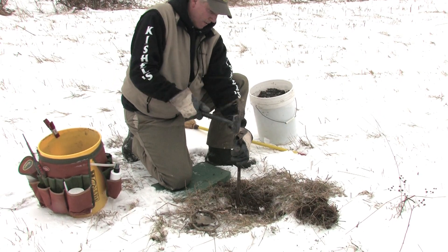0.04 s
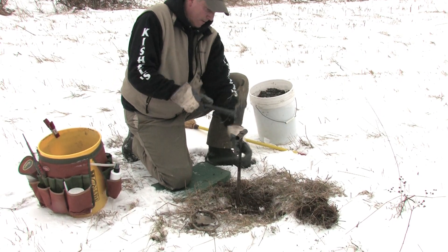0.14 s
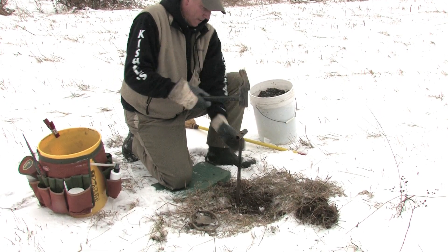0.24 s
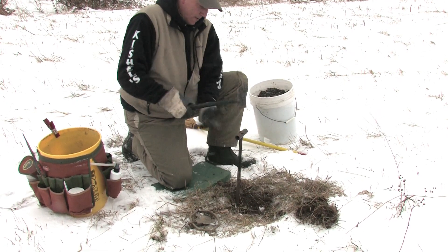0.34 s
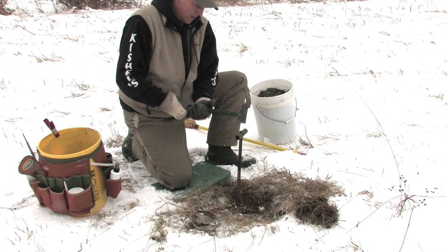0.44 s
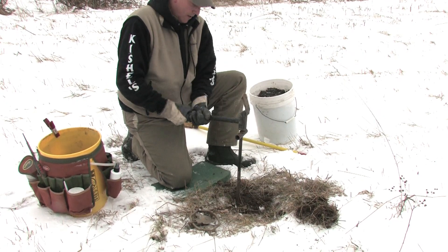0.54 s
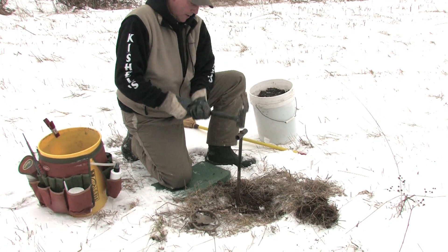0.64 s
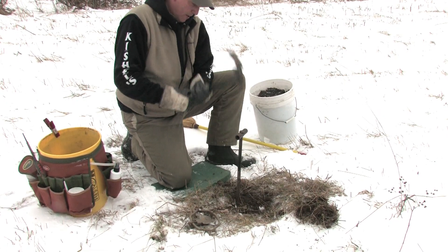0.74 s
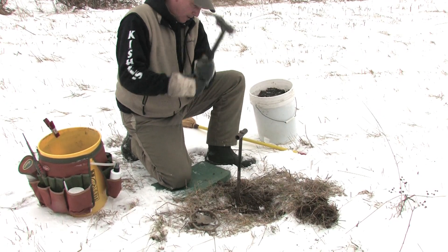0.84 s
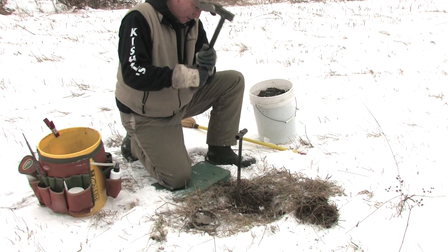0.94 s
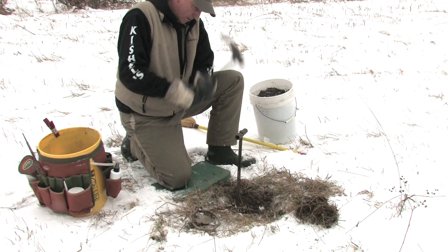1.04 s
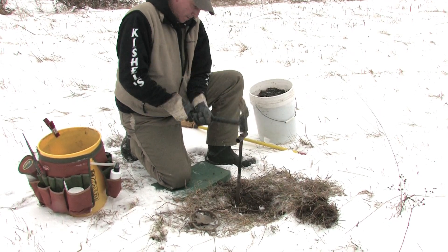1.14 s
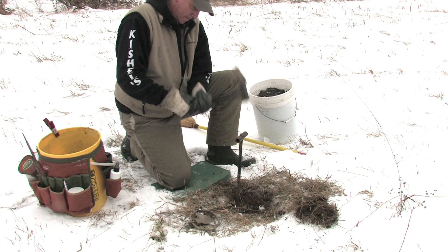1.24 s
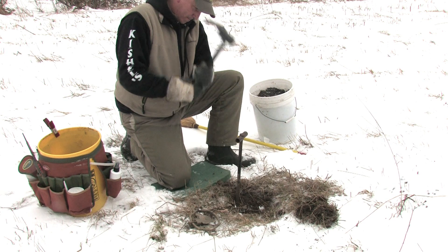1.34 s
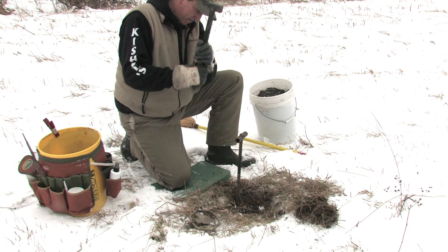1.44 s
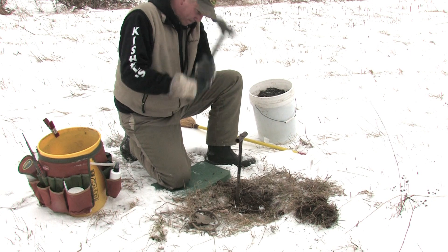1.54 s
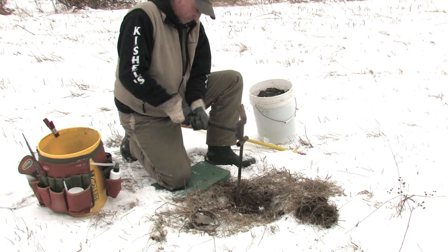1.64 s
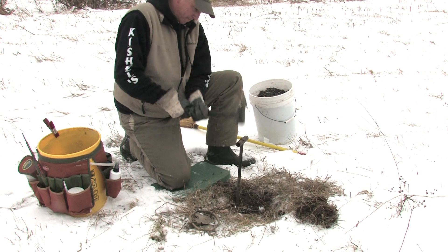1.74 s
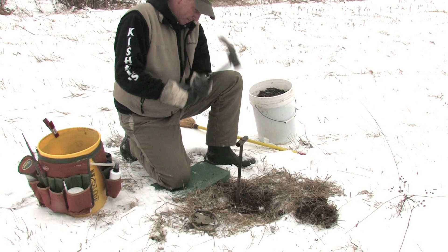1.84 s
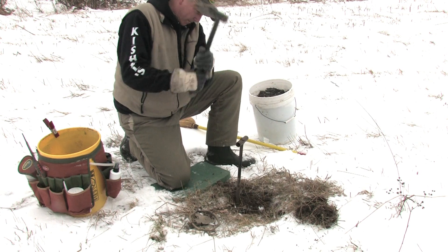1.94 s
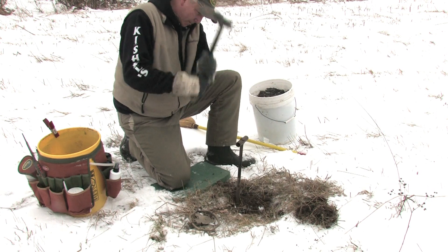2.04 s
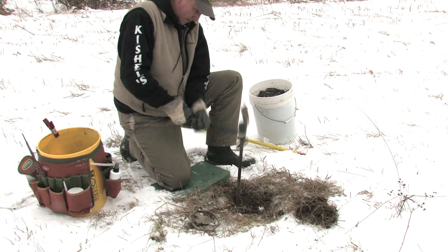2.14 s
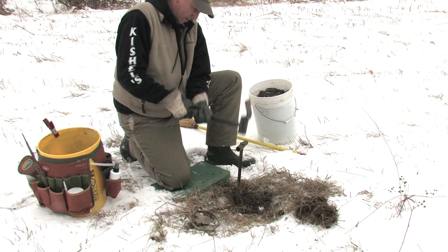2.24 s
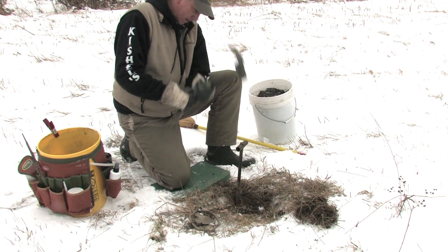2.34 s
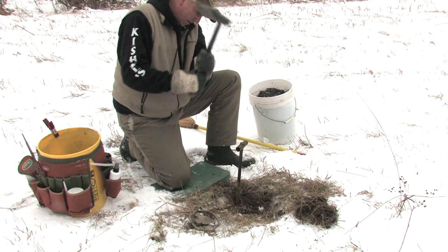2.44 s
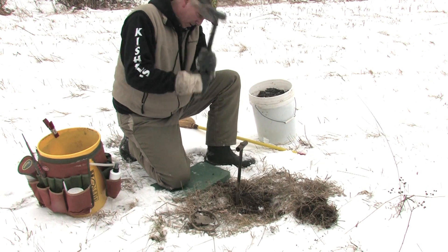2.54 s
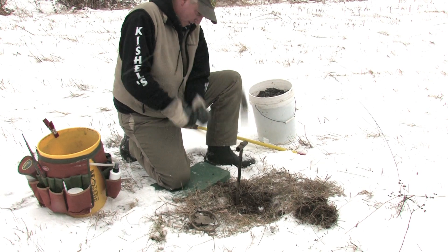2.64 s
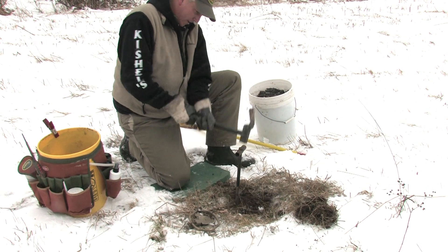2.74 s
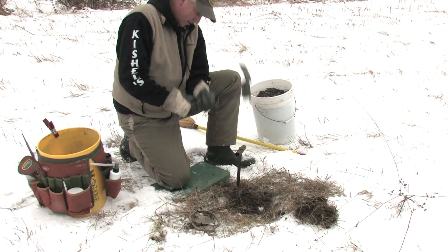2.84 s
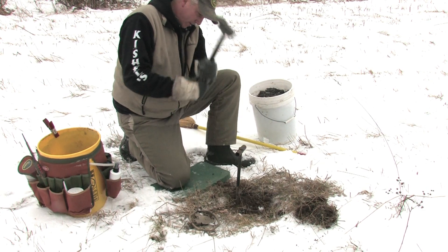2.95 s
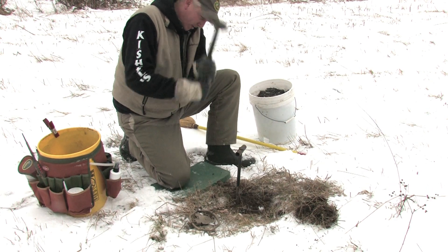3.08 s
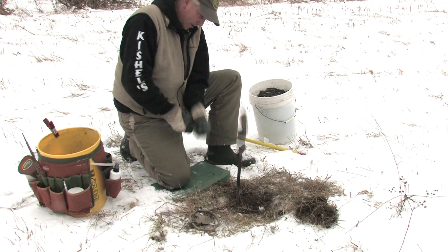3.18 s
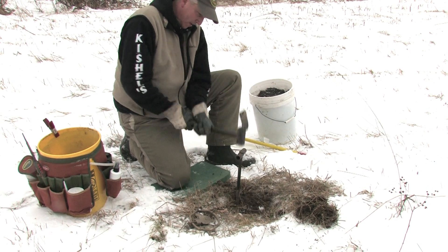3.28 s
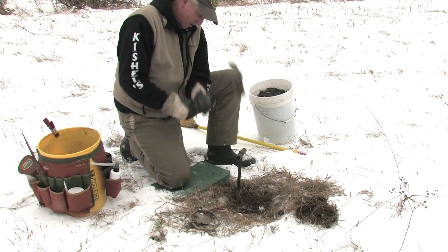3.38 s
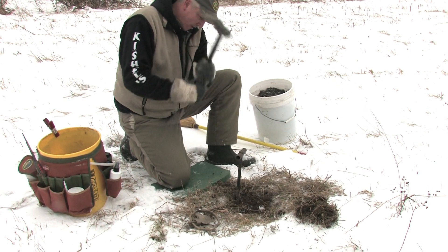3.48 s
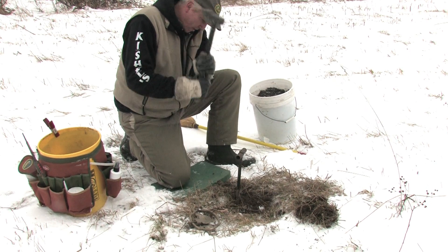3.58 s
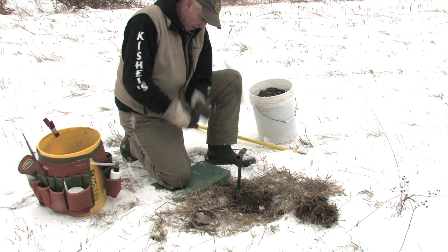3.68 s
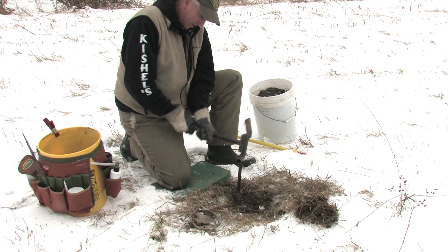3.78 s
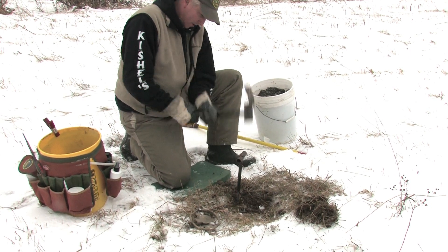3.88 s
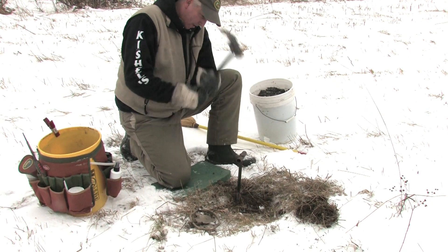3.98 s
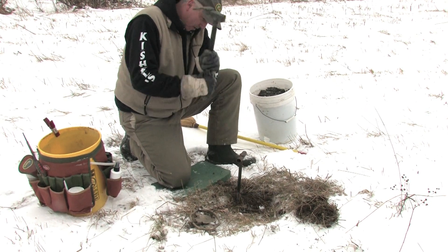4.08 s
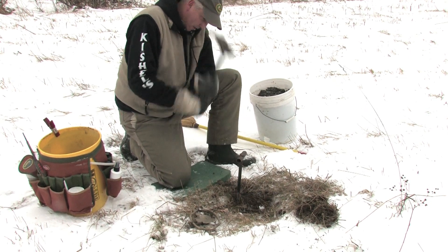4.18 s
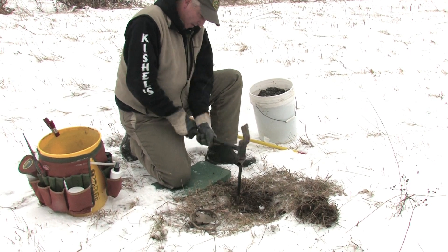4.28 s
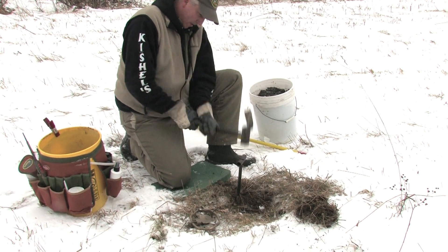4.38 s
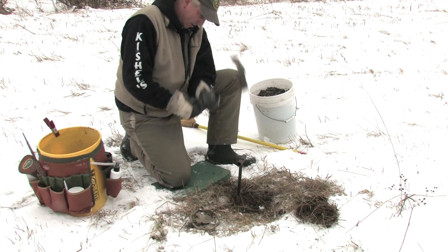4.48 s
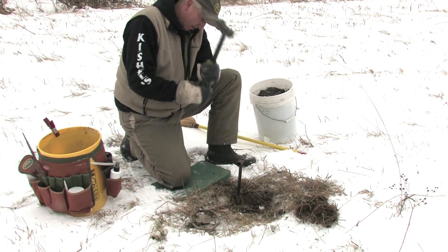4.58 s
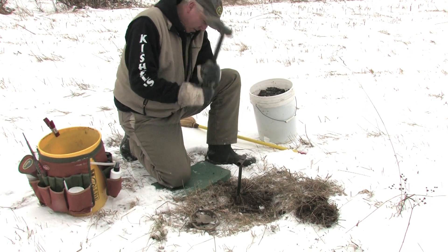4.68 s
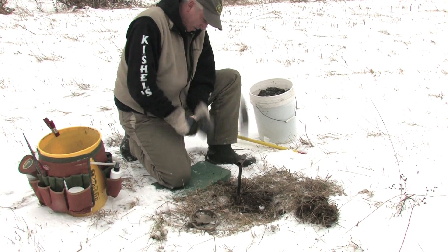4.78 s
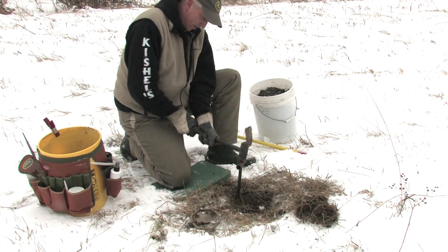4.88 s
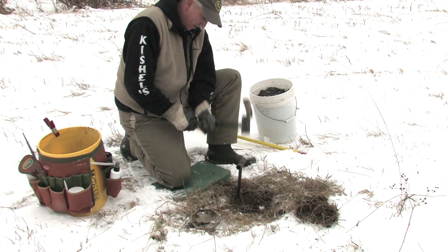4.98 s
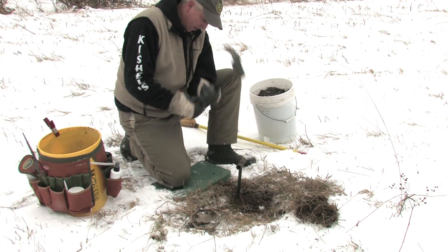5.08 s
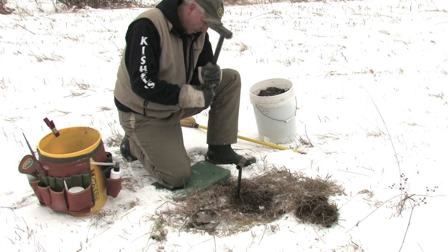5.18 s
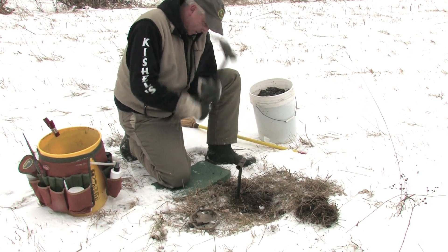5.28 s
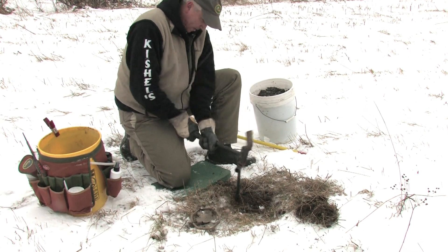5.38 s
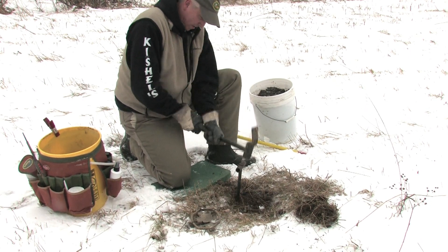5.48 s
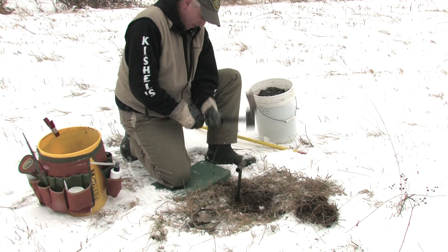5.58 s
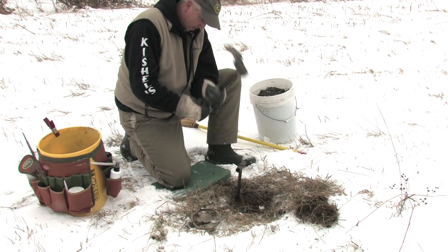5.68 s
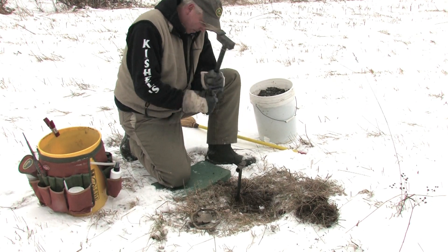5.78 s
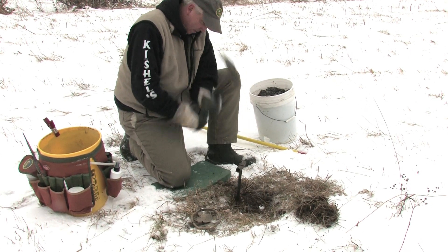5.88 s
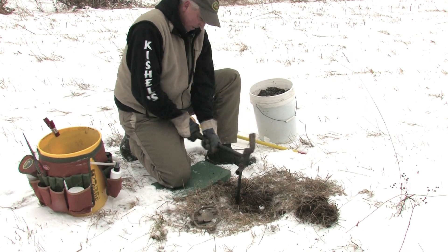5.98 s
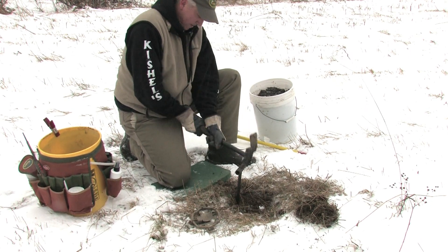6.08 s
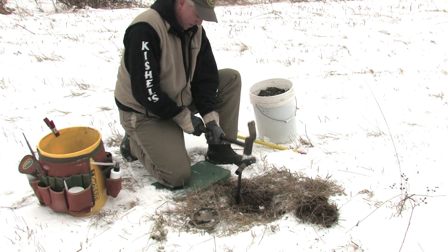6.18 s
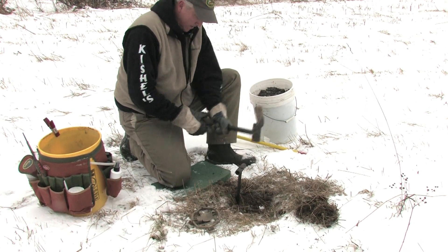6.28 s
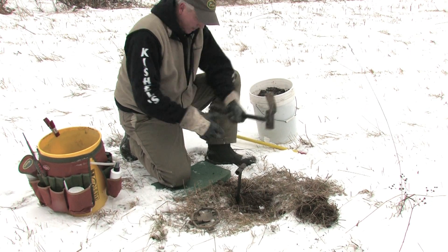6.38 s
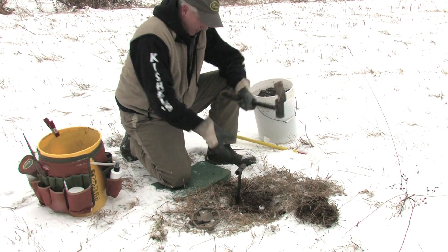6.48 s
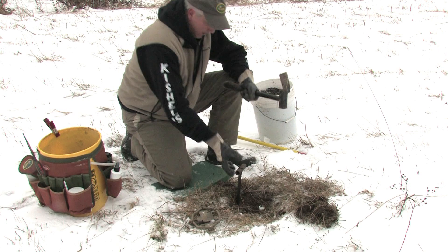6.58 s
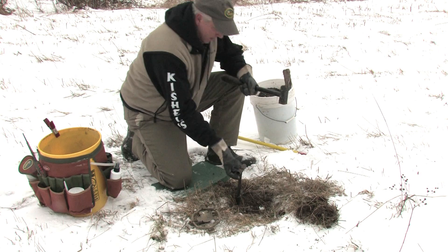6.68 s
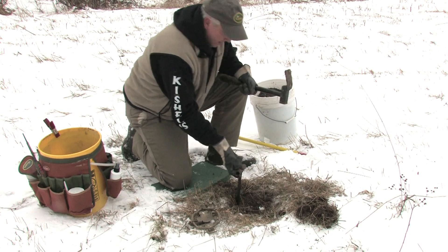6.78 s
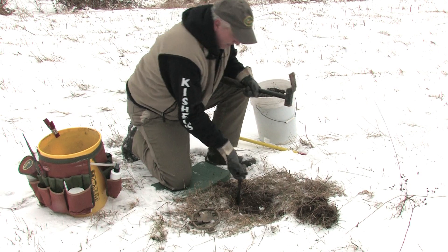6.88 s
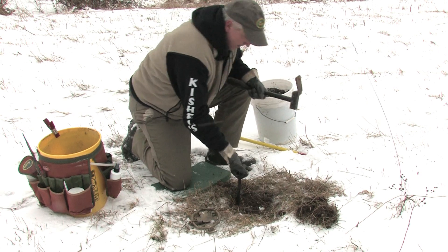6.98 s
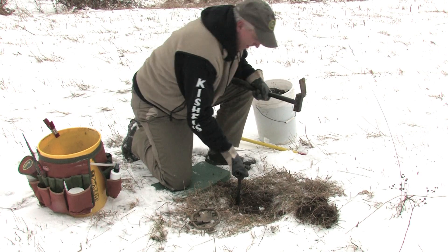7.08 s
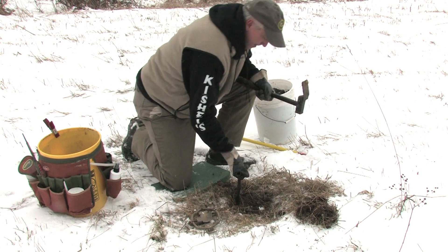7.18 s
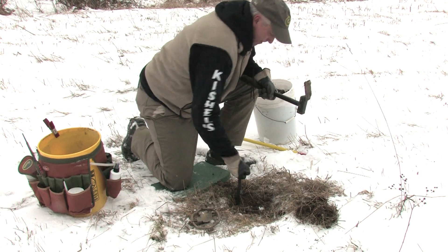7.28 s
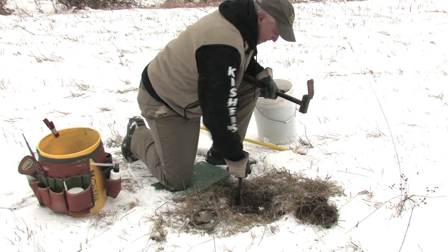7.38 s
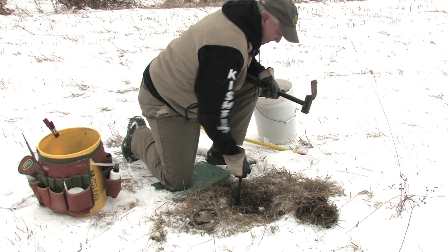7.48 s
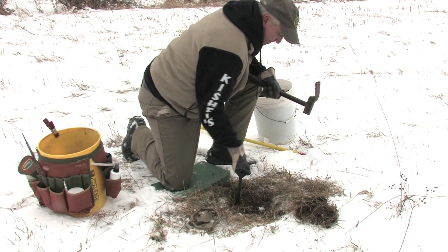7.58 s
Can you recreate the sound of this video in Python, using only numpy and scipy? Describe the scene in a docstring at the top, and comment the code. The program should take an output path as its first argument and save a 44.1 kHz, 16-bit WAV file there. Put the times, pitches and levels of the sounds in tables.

```python
"""Steel stake in frozen ground

Ten hammer blows drive a stake in an open, snowy field. Each overloads the microphone, whose gain drops
and creeps back. Soil chokes the ring of the stake, which brightens as it sinks; distant trees return
a faint echo. Wind buffets the microphone, sleeves swish with each swing, and at the end a glove works
the stake in dry grass."""
import sys
import numpy as np
from scipy import signal
from scipy.fft import rfft, irfft
from scipy.io import wavfile

SR = 44100
rng = np.random.default_rng(int(sys.argv[2]) if len(sys.argv) > 2 else 0)


def waveform_to_disk(signal):
    """Save audio, clipped to [-1, 1], as 16-bit WAV at the path in sys.argv[1]."""
    frames = np.transpose(np.atleast_2d(signal))
    scaled = np.clip(frames, -1, 1) * 32767
    samples = np.round(scaled).astype(np.int16)
    wavfile.write(sys.argv[1], SR, samples)


N = 336483
TIME_S = np.arange(N) / SR
BLOW_TIME_S = TIME_S[:SR // 3]

# hammer blows: start_s, force_db, rebound_delay_s, low_mode_db, high_modes_db, soil_knock_db
BLOWS = [(1.1552, -5.5, .0079, 12, -8, 0.5), (1.6816, -6, .01, 9, 1.5, -8.5),
         (2.1957, -1.5, .0095, 1, -1, -4), (2.7155, -3, .0089, 1, -6.5, 1.5),
         (3.2356, -3.5, .0094, 5.5, 5.5, 2), (3.769, -4.5, .01, -5.5, 5.5, 1.5),
         (4.3075, -4.5, .008, -0.5, 1, 5.5), (4.851, -4.5, .0096, -5, 8, -9.5),
         (5.4171, -4.5, .0079, -9, 5.5, -2.5), (5.9987, -6, .008, -7.5, 12, -4)]
# bending modes of the stake: pitch_hz, level_db, t60_s
STAKE_MODES = [(847.3, -30, 0.049), (1412, -7.5, 0.044), (1517, -14, 0.024), (2420, -3.5, 0.019),
               (2569.5, 3, 0.042), (2590, -5, 0.0093), (3280, -15.5, .03), (3942, -3, 0.035),
               (4109, -4, 0.03), (4215, 0.5, 0.015), (4470, -13, 0.017), (4706, -8, .025),
               (5820, -21, 0.016), (6300, -7, 0.016), (7580, -8.5, 0.017), (8089, -1, 0.026),
               (8177, -6.5, .028), (8200, -63, 0.56), (8360, -11.5, 0.031), (10010, -6.5, .028),
               (10080, -19.5, 0.13), (11410, -16.5, .036), (10620, -14.5, 0.063), (13300, -15, .03)]
# lingering modes of the hammer head: pitch_hz, level_db, t60_s
HEAD_MODES = [(10330, -60, 0.22), (10530, -52.5, .16), (10690, -52, .14), (10860, -52, .16)]
# dense vibration of steel and soil: freq_hz, density_db
CRASH_SPECTRUM = [(50, -9), (150, -7), (300, -16), (620, -0.5), (920, -3), (1150, -15.5), (1700, 2.5),
                  (2300, 5.5), (3300, -4.5), (5200, -4.5), (7200, 6), (9200, -2), (10600, -1),
                  (11800, -13.5), (15000, -14)]
# its damping: freq_hz, t60_s
CRASH_DECAY = [(100, 0.0067), (700, 0.033), (2000, 0.023), (6000, .022), (10500, 0.023), (15000, 0.0067)]
# faint dying ring of steel at the start: start_s, level_db
OPENING_RING = [(.001, -38)]
# its modes: pitch_hz, level_db, t60_s
OPENING_RING_MODES = [(968, 0, 0.076), (2060, 8, 0.032), (2500, -4.5, 0.093), (3940, 13, 0.04),
                      (4550, 0.5, 0.042), (6300, -9.5, 0.068), (8100, 1.5, 0.045), (10520, 3.5, 0.094)]
# echo from the trees: freq_hz, density_db
ECHO_SPECTRUM = [(1000, -9.5), (2600, -9.5), (3300, -16), (4050, -0.5), (5200, -19), (7300, -8),
                 (7850, -3.5), (8100, 4), (8500, -5), (9300, -13), (10600, -2), (11500, -17), (15000, -21)]
# wind strength: time_s, level_db
GUSTS = [(0.0, -50), (0.5, -31.9), (0.68, -23.5), (0.89, -25.5), (1.03, -18), (1.23, -29), (1.55, -29),
         (1.87, -41.5), (2.17, -24.5), (2.54, -42.5), (2.62, -31), (2.86, -36.5), (3.74, -40),
         (4.15, -33.5), (4.27, -44), (4.73, -53.5), (5.27, -51), (5.34, -46.7), (5.68, -60), (6.74, -50),
         (6.82, -41.5), (7.11, -47), (7.33, -35.5), (7.41, -48.5), (7.63, -41)]
# eddies at the microphone: freq_hz, density_db
WIND_SPECTRUM = [(15, -31), (30, -13.5), (55, -0.5), (120, -1), (200, -5.5), (300, -10.5), (450, -16.5),
                 (650, -23), (1000, -33.5), (1500, -42), (2500, -50), (5000, -80.5)]
# left-right likeness of the eddies: freq_hz, correlation
WIND_CORRELATION = [(40, 0.23), (100, .55), (200, 0.46), (600, 0.067), (1500, 0.47)]
# sleeve friction: freq_hz, density_db
SLEEVE_SPECTRUM = [(300, -11), (550, 0.5), (750, 3), (1100, -1.5), (1800, 0.5), (2100, -3), (2400, -1.5),
                   (3100, -11), (3600, -7.5), (4050, -4), (4600, -12.5), (5400, -24.5), (8000, -34.5),
                   (15000, -54)]
# glove friction: freq_hz, density_db
GLOVE_SPECTRUM = [(500, -25.5), (2000, -9.5), (3300, -6), (4000, 8), (5000, -9.5), (6400, 5.5), (7300, 0.5),
                  (8200, 3), (9500, -1), (11500, -9), (13500, -9.5), (14500, -18), (16000, -36)]
# gripping, winding up, laying the hammer aside, working the stake: start_s, length_s, sleeve_db, glove_db
ARM_MOVES = [(.32, 0.022, -55.5, -59), (.58, 0.053, -50, -62), (.68, 0.59, -57.5, -66.5),
             (2.34, 0.159, -63.5, -74), (6.3, 0.087, -65, -64), (6.67, 0.92, -62, -70.5),
             (6.82, 0.24, -59.5, -67.5), (6.93, 0.02, -52, -59)]
# glove sliding on steel: start_s, length_s, level_db, pitch_hz
GLOVE_RUBS = [(2.35, .17, -61.5, 1752), (6.28, 0.084, -69, 2466)]
# snaps of dry stalks, clothing and tools: start_s, level_db, t60_s, centre_hz
SNAPS = [(.001, -31, 0.037, 3270), (0.4365, -34.5, 0.05, 1570), (0.444, -37, 0.006, 2140),
         (0.586, -44.5, 0.02, 1820), (1.444, -58, 0.0093, 3960), (1.98, -56, 0.016, 2500),
         (6.057, -44, .02, 4000), (6.087, -52, 0.059, 2980), (6.104, -48, .02, 4963),
         (6.662, -51, 0.026, 1060), (6.811, -50.5, 0.029, 8000), (6.884, -35, 0.02, 980),
         (7.4056, -32, 0.01, 2760)]


def hammering(rebound_db=-11):
    """Each blow: main contact, ring of the head, weaker contact as the stake springs back."""
    out = np.zeros(N)
    for k, (start_s, force_db, rebound_delay_s, low_db, high_db, knock_db) in enumerate(BLOWS):
        middle_db = 3.5 - 0.52 * k   # middle modes fade as the stake sinks
        head_db = 1.5 + 22 * np.exp(-k / 1.9)   # louder while the stake stands loose
        main = contact(low_db, middle_db, high_db, knock_db, crash_db=3, scatter_db=0.36)
        rebound = contact(low_db - 3.5, middle_db - 5.5, high_db - 1.5, knock_db,
                          crash_db=2.5, scatter_db=1.5)
        add(out, start_s, from_db(force_db) * (main + head_ring(head_db)))
        add(out, start_s + rebound_delay_s, from_db(force_db + rebound_db) * rebound)
    return out


def contact(low_db, middle_db, high_db, knock_db, crash_db, scatter_db):
    """Steel on steel; the grip of the soil shifts and roughens the stake's modes each time."""
    pitch_hz, level_db, t60_s = np.transpose(STAKE_MODES)
    detune, scatter = rng.standard_normal((2, len(pitch_hz)))
    colour_db = at_hz([(900, -low_db / 2), (1350, low_db), (2500, middle_db),
                       (4200, (middle_db + high_db) / 2), (8000, high_db), (10700, 0)], pitch_hz)
    mode_db = level_db + colour_db + scatter_db * scatter
    modes = ring(pitch_hz * (1 + 0.003 * detune), mode_db, t60_s, linewidth_hz=8.3)
    return modes + from_db(crash_db) * crash(high_db, knock_db)


def crash(bright_db, knock_db):
    """Dense vibration of steel and soil; each octave builds in about a cycle and dies at its own rate."""
    size = len(BLOW_TIME_S)
    spectrum = rfft(noise(CRASH_SPECTRUM, size))
    octave = np.clip(np.log2(np.maximum(bins_hz(size), 1) / 100), 0, 7)
    out = np.zeros(size)
    for k in range(8):
        centre_hz = 100 * 2 ** k
        tilt_db = bright_db * (k - 5) / 8   # a firmly seated stake is brighter
        soil_db = at_hz([(150, 0), (400, knock_db), (1600, 0)], centre_hz)
        band = irfft(spectrum * np.maximum(0, 1 - abs(octave - k)), size)
        attack = 1 - np.exp(-BLOW_TIME_S * centre_hz)
        out += from_db(tilt_db + soil_db) * band * attack * decay(at_hz(CRASH_DECAY, centre_hz))
    return out


def head_ring(ring_db, scatter_db=3.5):
    """Close modes of the hammer head beat, mixed anew by each blow and widened by the handle's grip."""
    pitch_hz, level_db, t60_s = np.transpose(HEAD_MODES)
    mode_db = level_db + ring_db + scatter_db * rng.standard_normal(len(pitch_hz))
    return ring(pitch_hz, mode_db, t60_s, linewidth_hz=20)


def opening_ring():
    """Faint dying ring of steel from a blow struck just before the start."""
    out = np.zeros(N)
    for start_s, level_db in OPENING_RING:
        add(out, start_s, from_db(level_db) * ring(*np.transpose(OPENING_RING_MODES)))
    return out


def wind(trim_db=-0.5, lumps_db=3, left_db=1.34, small_above_hz=304, brighten_db_per_db=0.068):
    """Lumpy eddies at the two microphone ports, partly shared; strong gusts are brighter."""
    correlation = np.clip(at_hz(WIND_CORRELATION, bins_hz(N)), 0, 1)
    mid = irfft(rfft(noise(WIND_SPECTRUM, N)) * np.sqrt(1 + correlation), N)
    side = irfft(rfft(noise(WIND_SPECTRUM, N)) * np.sqrt(1 - correlation), N)
    ports = np.array([(mid + side) * from_db(left_db), mid - side])
    eddies = unit_rms(ports * from_db(lumps_db * drift(rate_hz=60)))
    small = signal.sosfiltfilt(highpass(small_above_hz), eddies)
    large = eddies - small
    gust_db = np.interp(TIME_S, *np.transpose(GUSTS))
    bright_db = brighten_db_per_db * (gust_db - gust_db.mean())
    return from_db(gust_db + trim_db) * (large + small * from_db(bright_db))


def arm_motion(lift_after_s=0.31, lift_s=0.047, downswing_s=0.025):
    """Rubbing strength of sleeves and gloves: lifts, downswings and other moves add in power."""
    lift_db, downswing_db, rest_db = (-66, -73.5), (-62, -74), (-69, -78)   # sleeve, glove
    blows_s = [blow[0] for blow in BLOWS]
    lifts = [(blow_s + lift_after_s, lift_s, *lift_db) for blow_s in blows_s[:-1]]
    downswings = [(blow_s - downswing_s, downswing_s, *downswing_db) for blow_s in blows_s]
    power = from_db(rest_db)[:, None] ** 2
    for start_s, length_s, *levels_db in lifts + downswings + list(ARM_MOVES):
        power = power + (from_db(levels_db)[:, None] * stroke(start_s, length_s)) ** 2
    return np.sqrt(power)


def rustle(motion, spectrum, flutter_db, grain_db=1.5):
    """Fabric rubs in tiny catches as the arms move."""
    friction = noise(spectrum, N)
    catches_db = grain_db * drift(rate_hz=900) + flutter_db * drift(rate_hz=70)
    return motion * unit_rms(friction * from_db(catches_db))


def glove_rubs(width_hz=90):
    """A glove slides on steel: friction through one narrow resonance."""
    out = np.zeros(N)
    radius = np.exp(-np.pi * width_hz / SR)
    for start_s, length_s, level_db, pitch_hz in GLOVE_RUBS:
        resonance = [1, -2 * radius * np.cos(2 * np.pi * pitch_hz / SR), radius ** 2]
        tone = signal.lfilter([1, 0, -1], resonance, rng.standard_normal(N))
        out += from_db(level_db) * stroke(start_s, length_s) * unit_rms(tone)
    return out


def snaps(ticks_per_s=4, tick_db=-59, spread_db=1.5, tick_t60_s=0.015, tick_hz=6000):
    """Stalks, clothing and tools snap in short noise bursts; fainter ticks come at random."""
    out = np.zeros(N)
    ticks = [(start_s, tick_db + spread_db * rng.standard_normal(), tick_t60_s, tick_hz)
             for start_s in TIME_S[rng.random(N) < ticks_per_s / SR]]
    for start_s, level_db, t60_s, centre_hz in list(SNAPS) + ticks:
        edges_hz = [centre_hz / 2.6, min(centre_hz * 2.6, 0.32 * SR)]
        bandpass = signal.butter(2, edges_hz, "band", fs=SR, output="sos")
        burst = unit_rms(signal.sosfilt(bandpass, rng.standard_normal(len(BLOW_TIME_S))))
        add(out, start_s, from_db(level_db) * decay(t60_s) * burst)
    return out


def tree_echo(delay_s=0.056, near_db=-50, near_t60_s=0.14, far_db=-62.5, far_t60_s=0.87):
    """Trunks some ten metres off scatter each blow back as a treble swell; farther ones add a tail."""
    out = np.zeros(N)
    swell = np.minimum(BLOW_TIME_S / delay_s, 1) ** 10
    near = from_db(near_db - 60 * np.maximum(BLOW_TIME_S - delay_s, 0) / near_t60_s)
    far = from_db(far_db) * decay(far_t60_s)
    envelope = swell * (near + far)
    for start_s, force_db, *_ in BLOWS:
        add(out, start_s, from_db(force_db) * envelope * noise(ECHO_SPECTRUM, len(envelope)))
    return out


def ring(pitch_hz, level_db, t60_s, linewidth_hz=0):
    """Struck modes as decaying sines; rubbing makes the phase wander, widening each line."""
    signs = rng.choice([-1, 1], len(pitch_hz))
    steps = rng.standard_normal((len(pitch_hz), len(BLOW_TIME_S)))
    wander_rad = np.cumsum(steps, axis=1) * np.sqrt(2 * np.pi * linewidth_hz / SR)
    fade = from_db(level_db[:, None] - 60 * BLOW_TIME_S / t60_s[:, None])
    return signs @ (fade * np.sin(2 * np.pi * pitch_hz[:, None] * BLOW_TIME_S + wander_rad))


def stroke(start_s, length_s, attack_s=0.025, release_s=0.035):
    """Envelope of one movement: swell, hold, fade."""
    before_s = np.maximum(start_s - TIME_S, 0)
    after_s = np.maximum(TIME_S - start_s - length_s, 0)
    return np.exp(-before_s / attack_s - after_s / release_s)


def decay(t60_s):
    """Exponential decay over the length of a blow."""
    return from_db(-60 * BLOW_TIME_S / t60_s)


def noise(spectrum, size):
    """Coloured noise, unit power."""
    white = rfft(rng.standard_normal(size))
    return unit_rms(irfft(white * from_db(at_hz(spectrum, bins_hz(size))), size))


def drift(rate_hz):
    """Random wander, unit power."""
    points = rng.standard_normal(N // 20)
    return unit_rms(np.interp(TIME_S * rate_hz, np.arange(len(points)), points))


def at_hz(table, freq_hz):
    """Read a table on a log-frequency axis."""
    knots_hz, values = np.transpose(table)
    return np.interp(np.log(np.maximum(freq_hz, 1)), np.log(knots_hz), values)


def bins_hz(size):
    """Frequencies of a real FFT."""
    return np.arange(size // 2 + 1) * SR / size


def highpass(corner_hz):
    """Second-order high-pass sections."""
    return signal.butter(2, corner_hz, "high", fs=SR, output="sos")


def from_db(level_db):
    """Decibels to gain."""
    return 10 ** (np.asarray(level_db) / 20)


def unit_rms(x):
    """Scale to unit power."""
    return x / np.sqrt(np.mean(x ** 2) + 1e-20)


def add(track, start_s, sound):
    """Mix a sound into a track."""
    start = max(0, round(start_s * SR))
    track[start:start + len(sound)] += sound[:N - start]


def gain_control(x, threshold_db=-10.5, smooth_s=0.013, release_db_per_s=23, sense_above_hz=350):
    """Peaks over the threshold pull the gain down, rumble does not; it creeps back at a steady rate."""
    sensed = signal.sosfilt(highpass(sense_above_hz), x.mean(axis=0))
    over_db = np.maximum(20 * np.log10(abs(sensed) + 1e-9) - threshold_db, 0)
    recovery_db = release_db_per_s * TIME_S
    held_db = np.maximum.accumulate(over_db + recovery_db) - recovery_db
    pole = np.exp(-1 / (smooth_s * SR))
    duck_db = signal.lfilter([(1 - pole) ** 2], [1, -2 * pole, pole ** 2], held_db)
    return x * from_db(-duck_db)


def scene():
    """The work is straight ahead; only the wind differs between the sides."""
    blows = hammering() + tree_echo()
    sleeve_motion, glove_motion = arm_motion()
    sleeves = rustle(sleeve_motion, SLEEVE_SPECTRUM, flutter_db=0.4)
    gloves = rustle(glove_motion, GLOVE_SPECTRUM, flutter_db=1.5)
    return blows + sleeves + gloves + wind() + glove_rubs() + opening_ring() + snaps()


def record(dry):
    """Overload flattens the onset of each blow and the gain ducks; deep rumble and the top are cut."""
    ceiling, low_cut_hz, high_cut_hz = 0.9, 35, 15700
    clipped = dry / (1 + (dry / ceiling) ** 6) ** (1 / 6)
    coupled = signal.sosfilt(highpass(low_cut_hz), gain_control(clipped))
    return signal.sosfilt(signal.cheby1(12, 0.2, high_cut_hz, fs=SR, output="sos"), coupled)


dry = scene()
out = record(dry)
waveform_to_disk(out)
```